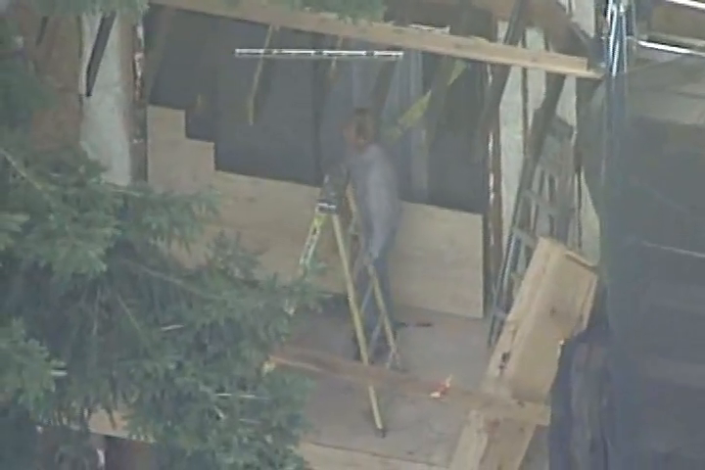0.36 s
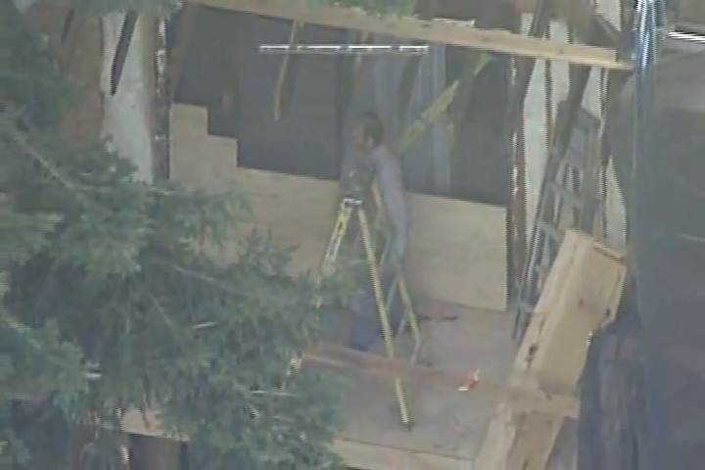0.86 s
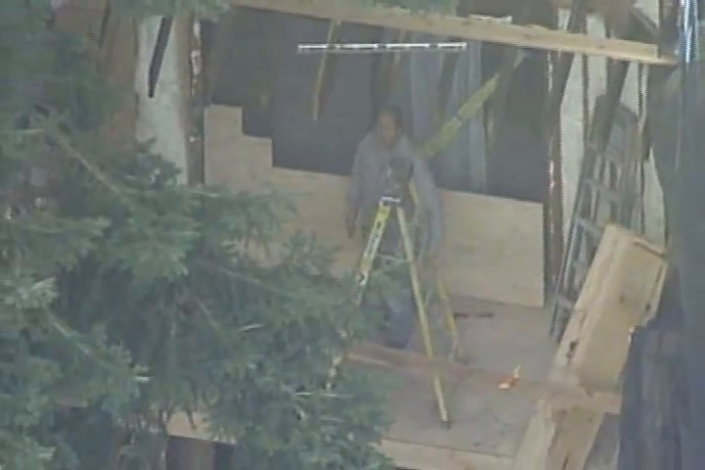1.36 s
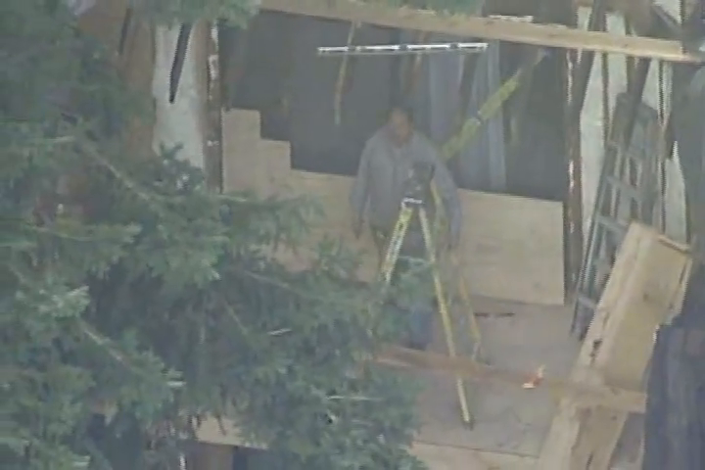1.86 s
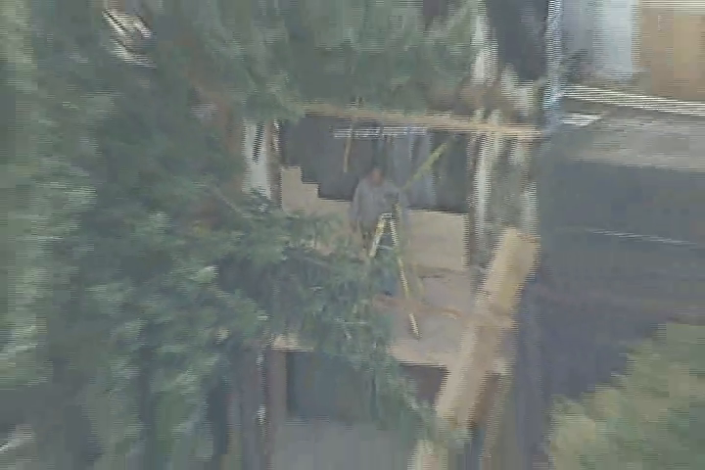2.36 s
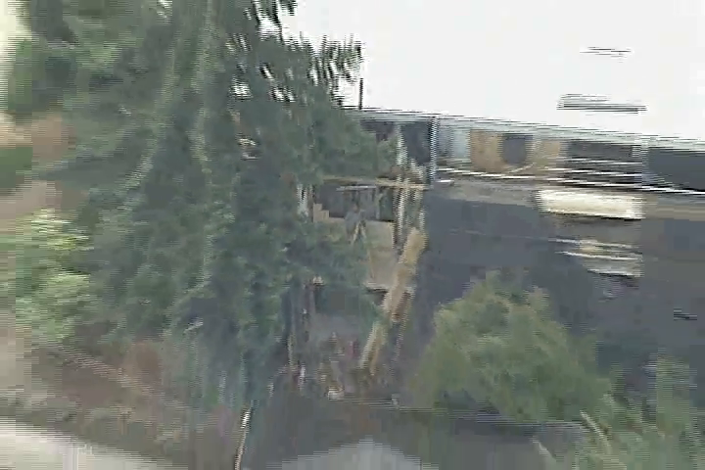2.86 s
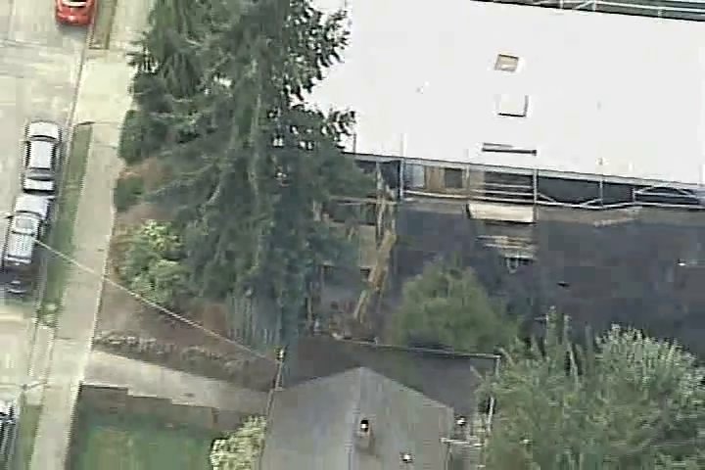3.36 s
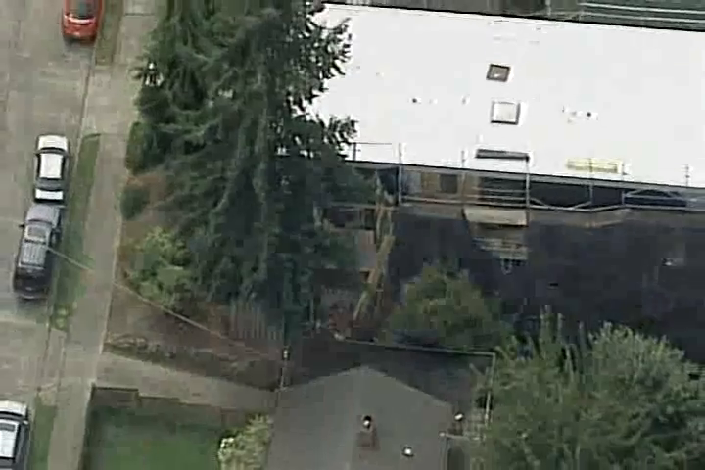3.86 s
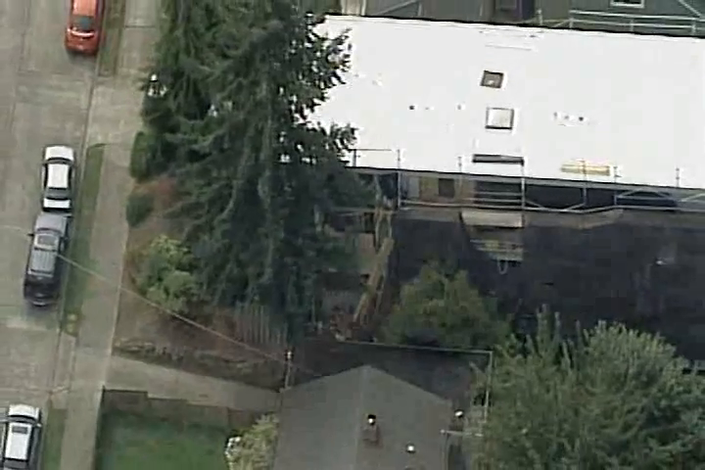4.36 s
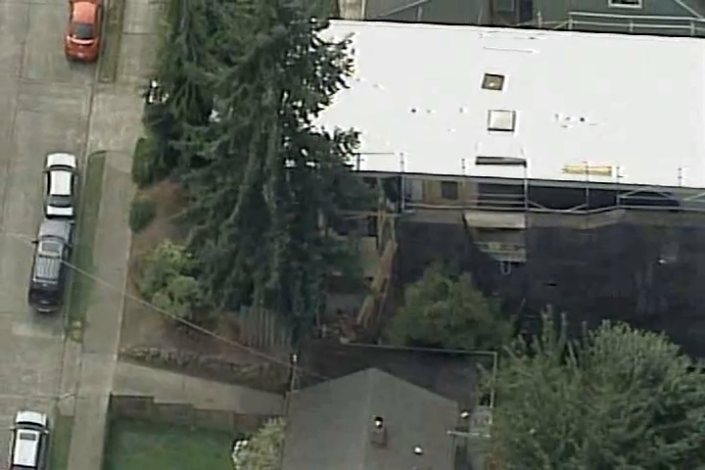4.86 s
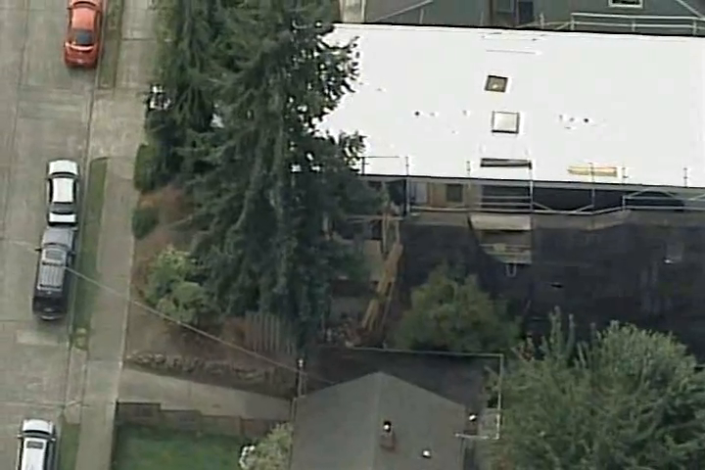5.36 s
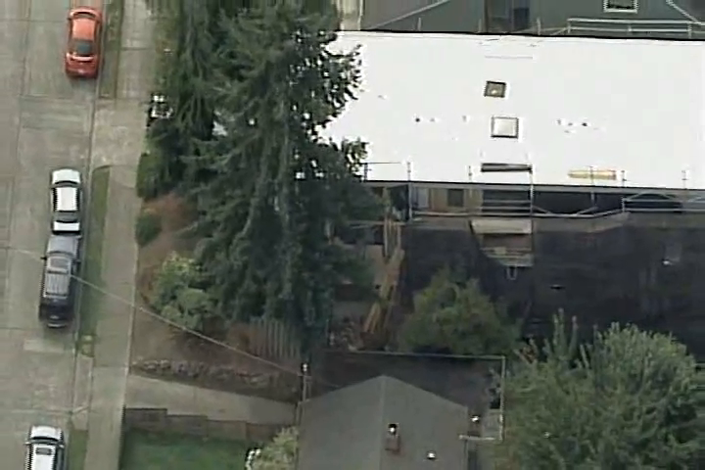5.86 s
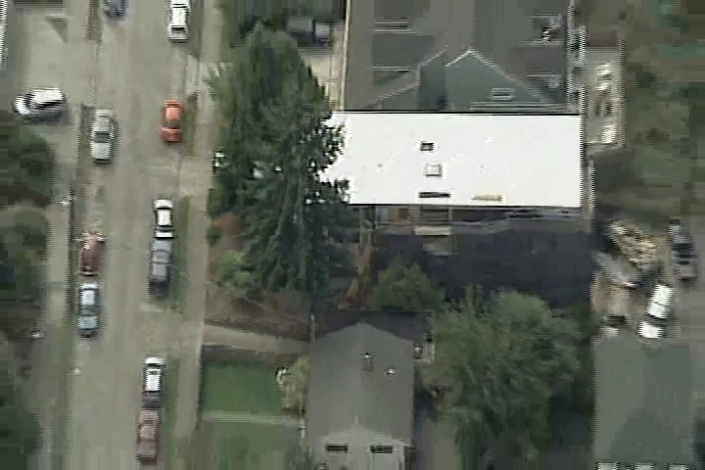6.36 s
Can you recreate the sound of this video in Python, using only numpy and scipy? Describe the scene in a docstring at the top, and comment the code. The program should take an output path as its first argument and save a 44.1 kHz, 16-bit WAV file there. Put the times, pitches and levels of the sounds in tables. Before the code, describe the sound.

A continuous helicopter drone from a microphone in the cabin, entirely on the left side. The deep hum pulses rapidly, over a low roar that throbs gently with the main blades, a breathy wash of air and several layers of high whine. Small, bright metallic rattles with tiny bounces break through irregularly all along, without the engine changing pace. The right side carries barely audible hiss and electrical buzz. Nothing is heard from the worker or street far below.

```python
"""Inside a helicopter cabin in steady flight, one microphone wired to the left input only.
The drive shaft and the tail rotor hum as two close tones that beat; gears, turbine and electrics whine as sines.
Shaped noise makes the rush of air, the low roar and a cabin boom. A loose part rings and snaps at listed
moments, and more faintly by chance when the beat swings deep. The right input holds hiss, buzz and a
trace of crosstalk."""
import sys
import numpy as np
from scipy import signal
from scipy.fft import rfft, irfft, next_fast_len
from scipy.io import wavfile
from scipy.ndimage import map_coordinates

SR = 44100
rng = np.random.default_rng(int(sys.argv[2]) if len(sys.argv) > 2 else 0)


def decibels_to_gain(level_db):
    """Convert a level in decibels to a linear amplitude gain (20 dB per decade)."""
    exponent = np.asarray(level_db, float) / 20
    return 10 ** exponent


def pcm_store(signal):
    """Save signal as 16-bit PCM."""
    levels = np.round(np.clip(np.atleast_2d(signal), -1, 1) * 32767)
    wavfile.write(sys.argv[1], SR, levels.astype(np.int16).T)


N = 296352  # length in samples

# slow level changes of three sounds: start_s, gear_mesh_db, tail_hum_db, cabin_boom_db
SLOW_LEVELS = [(0, -40, -23.5, -47), (.4, -41.5, -23.5, -46), (1, -41, -23.5, -49.5), (1.9, -42, -23, -45),
               (2.6, -40, -23, -48), (3.2, -40.5, -22.5, -50), (3.55, -40.5, -22.5, -45),
               (4.2, -40.3, -22.5, -47.5), (4.8, -41, -22.9, -44), (5.4, -42.5, -22.8, -46),
               (6.2, -38.5, -22.5, -50.5), (6.72, -38.5, -24, -46)]
# strong knocks of the loose part: start_s, high_ring_peak_db, low_ring_db (relative to the high ring)
STRONG_RATTLES = [(.0437, -27, .5), (.081, -26, 2), (0.128, -31, 2), (.2233, -27.5, 3.5), (.2346, -32, 0),
                  (0.2722, -29.5, 6.5), (0.4527, -24, 1.5), (.6781, -30, -1), (.775, -27, 3.5),
                  (0.9547, -29.5, 1), (1.002, -32, -13), (1.0384, -31.5, 5), (1.1355, -25.5, -2),
                  (1.1823, -26, -2), (1.2776, -30, -1), (1.3154, -23.5, -2.5), (1.496, -28, 1.5),
                  (1.5429, -24, 0.5), (1.6382, -29.5, 2), (1.6857, -27, 4), (1.7687, -31.5, -2),
                  (1.8178, -28.5, 1), (1.866, -30, 8), (1.9497, -29, -4), (1.9977, -27, 3),
                  (2.0083, -31, -3), (2.046, -26, 5.5), (2.405, -30, 1.5), (2.5487, -26, 0.5),
                  (2.5854, -24, -5), (2.5957, -28, 3.5), (2.632, -33, 0), (2.7285, -27.5, 3.5),
                  (2.7658, -32, 2.5), (2.8123, -26.5, 2), (2.9075, -25, 0), (2.9568, -23, 3),
                  (3.087, -28, 1.5), (3.1, -22, -3), (3.2314, -28, 2), (3.267, -33, -0.5),
                  (3.316, -33.5, 4), (3.459, -28, 0.5), (3.6021, -32.5, -1), (3.675, -31.5, -1),
                  (3.7827, -30.5, 2), (3.8195, -25, -1), (3.8669, -25, 1.5), (3.9623, -27.5, 0),
                  (3.998, -36, 5), (4.1423, -33, 2), (4.1786, -32, -3), (4.19, -30, -0.5), (4.2274, -24, 2),
                  (4.322, -28, 3.5), (4.3335, -29, -6), (4.3712, -24, 3.5), (4.4081, -27.5, 7.5),
                  (4.501, -31, 0), (4.5135, -31, -1), (4.5517, -22.5, 2), (4.6816, -30.5, -1.5),
                  (4.729, -32, 3), (4.777, -32.5, 5.5), (4.9098, -31, 2), (5.0536, -29.5, 7),
                  (5.09, -29.5, 4), (5.1006, -35, 1), (5.138, -33, 5), (5.2815, -24, 3.5),
                  (5.414, -25.5, 1.5), (5.4242, -32.5, -4), (5.46, -32.5, 3), (5.5941, -23, 1),
                  (5.6042, -31.5, 7), (5.6412, -29, 0), (5.7853, -25, 2.5), (5.8221, -31, -3),
                  (5.9167, -28.5, 0.5), (5.9651, -27.5, 1), (6.002, -30, -2), (6.1451, -28, -1.5),
                  (6.2879, -34, 3), (6.3624, -34.5, 2), (6.373, -29.5, -2), (6.5062, -19, -6.5),
                  (6.5528, -33, -1.5), (6.6494, -21.5, -3), (6.6973, -26.5, 2)]
BLADE_RATIO = .2615  # main blade passes per turn of the drive shaft


def unit(x):
    """Scaled to rms 1."""
    return x / np.sqrt(np.mean(x ** 2))


def wobble(rate):
    """A smooth random curve through rate random points a second."""
    points = rng.standard_normal(int(N * rate / SR) + 4)
    return map_coordinates(points, [np.arange(N) * rate / SR])


def curve(rows, column):
    """One column of a timed table, drawn as straight lines with a value per sample."""
    rows = np.array(rows)
    return np.interp(np.arange(N) / SR, rows[:, 0], rows[:, column])


def rotation(rows):
    """Turns made so far at the speed in a timed table."""
    return np.cumsum(curve(rows, column=1)) / SR


def tones(turns, table, waver_db):
    """Sines at multiples of a rotation, each wavering in level."""
    total = 0
    for multiple, level_db in table:
        level = decibels_to_gain(level_db + waver_db * wobble(6))
        wave = np.cos(2 * np.pi * (multiple * turns + rng.random()))
        total = total + level * np.sqrt(2) * wave  # sqrt(2) makes the level an rms level
    return total


def filtered(x, response):
    """x with each frequency multiplied by a complex response."""
    size = next_fast_len(x.shape[-1] + SR // 10)  # spare room for the tail
    spectrum = rfft(x, size) * response(np.fft.rfftfreq(size, 1 / SR))
    return irfft(spectrum, size)[..., :x.shape[-1]]


def noise(colour):
    """Noise of rms 1 coloured by points of frequency_hz, level_db."""
    points_hz, points_db = np.transpose(colour)

    def response(hz):
        return decibels_to_gain(np.interp(np.log(hz + 1), np.log(points_hz), points_db))

    return unit(filtered(rng.standard_normal(N), response))


def ring(x, modes):
    """x through causal resonances, each applied twice for steep flanks and a soft start."""
    def response(f):
        total = 0
        for centre, width, gain_db in modes:
            once = 1j * f * width / (centre ** 2 - f ** 2 + 1j * f * width)
            total = total + decibels_to_gain(gain_db) * once ** 2
        return total

    return filtered(x, response)


def drive_shaft():
    """Turns of the drive shaft, whose slightly drifting speed sets the pitch of every geared sound."""
    # start_s, speed_turns_per_s
    shaft_speed = [(0, 105.31), (.48, 105.371), (.96, 105.362), (1.44, 105.447), (1.92, 105.482),
                   (2.4, 105.425), (2.88, 105.389), (3.36, 105.37), (3.84, 105.364), (4.32, 105.383),
                   (4.8, 105.389), (5.28, 105.373), (5.76, 105.284), (6.24, 105.205), (6.72, 105.149)]
    return rotation(shaft_speed)


def hum(shaft):
    """The two strong tones that beat; air loads make the tail rotor less steady."""
    tail_ratio = 2 * 9.5 / 24  # tail blade passes per turn of the drive shaft
    shaft_start, tail_start = -.235, -.41  # angles at time zero, in turns
    drive_level = decibels_to_gain(-21.5 + .12 * wobble(4.04))
    tail_level = decibels_to_gain(curve(SLOW_LEVELS, column=2) + .21 * wobble(9))
    drive = drive_level * np.cos(2 * np.pi * (shaft + shaft_start))
    tail = tail_level * np.cos(2 * np.pi * (tail_ratio * shaft + tail_start))
    return np.sqrt(2) * (drive + tail)


def gear_mesh(shaft):
    """The loudest gear pair, one cycle of tone per tooth."""
    teeth_per_turn = 2 * 9.5
    return decibels_to_gain(curve(SLOW_LEVELS, column=1)) * tones(shaft, [(teeth_per_turn, 0)], waver_db=.6)


def gear_whine(shaft):
    """Many tones geared to the drive shaft, so they follow its speed."""
    # multiple_of_shaft_speed, level_db
    gear_tones = [(.2615, -51), (.3958, -53), (.7312, -55), (1.0464, -48), (1.2083, -48), (1.5837, -48),
                  (1.7917, -50), (2, -49), (2.0531, -51), (2.5233, -55), (3, -51), (3.1667, -50),
                  (3.9584, -53), (4, -58), (4.75, -60), (5, -61), (5.0951, -54), (7.5494, -65), (15, -67),
                  (15.3633, -54), (16, -58), (17.2085, -62), (18, -52), (18.3868, -62), (18.4767, -61),
                  (21, -54), (22, -63), (23.2086, -48), (36, -63), (38, -56.5), (69, -76), (70, -58),
                  (71, -76)]
    return tones(shaft, gear_tones, waver_db=.6)


def turbine_whine():
    """Tones geared to the turbine, which has its own drifting speed."""
    # start_s, whine_pitch_hz
    turbine_speed = [(0, 4946.5), (1.12, 4947), (1.4, 4961.3), (1.65, 4961), (2, 4957), (2.9, 4959.3),
                     (6.72, 4959.6)]
    # multiple_of_whine_pitch, level_db
    turbine_tones = [(.1481, -61), (.1575, -62), (.1818, -59), (.2093, -67), (.3363, -66), (.4725, -65),
                     (.5455, -61), (.5714, -66), (.7143, -66), (.7273, -65), (.8846, -70), (.9231, -64),
                     (.9787, -68), (.987, -65), (1, -47), (1.013, -63), (1.4545, -76), (1.5751, -75),
                     (1.6667, -73), (2, -72)]
    return tones(rotation(turbine_speed), turbine_tones, waver_db=.5)


def electric_whine():
    """Electrical tones that hold a steady pitch."""
    # pitch_hz, level_db
    electric_tones = [(2499.9, -54), (4999.8, -68)]
    return tones(np.arange(N) / SR, electric_tones, waver_db=.4)


def air(shaft, shake):
    """Roar throbs with the main blades; the rush also flutters with the airframe's shaking."""
    # low roar shaped by the cabin: frequency_hz, relative_level_db (per Hz)
    roar_colour = [(10, -37), (30, -22), (60, -14), (80, -6), (130, -4.5), (190, -1), (250, -4.5),
                   (275, -8), (300, -8), (350, -10.5), (400, -9), (480, -17), (560, -12), (680, -15.5),
                   (1100, -28.5), (2000, -45.5)]
    # rush of air and engine: frequency_hz, relative_level_db (per Hz)
    rush_colour = [(500, -22), (1000, -3.5), (1500, -3.5), (1800, 0), (2600, -3), (3400, -3.5),
                   (4500, -6.5), (5300, -9), (6000, -14.5), (8000, -15), (9000, -23), (13500, -34),
                   (14060, -20.5), (14400, -28), (15700, -38)]
    blades = np.cos(2 * np.pi * BLADE_RATIO * shaft)
    roar_db = -34.5 + .56 * blades + .65 * wobble(12)
    roar = decibels_to_gain(roar_db) * noise(roar_colour)
    rush_db = -40 + .86 * blades - .63 * shake + .51 * wobble(40)
    rush = decibels_to_gain(rush_db) * noise(rush_colour)
    return roar + rush


def rattle(shake):
    """Each rattle is a blow and three quick bounces; faint ticks come in any deep downswing."""
    # the part's high ring: centre_hz, width_hz (of one pass), gain_db
    high_modes = [(5257, 250, 7), (5540, 110, -25)]
    # the part's low ring: centre_hz, width_hz (of one pass), gain_db
    low_modes = [(3200, 270, 0), (3282, 503, 15)]
    # broad snap of the contact: centre_hz, width_hz (of one pass), gain_db
    snap_modes = [(990, 590, -2.5), (1840, 410, 7), (2610, 520, -5), (3680, 550, 1.5), (7000, 520, -13.5),
                  (8200, 780, -19), (10420, 640, -9), (11500, 870, -14.5), (14700, 2800, -27)]
    length = SR // 30
    blow = np.zeros(length)
    blow[0] = 1
    voices = [ring(blow, modes) for modes in (high_modes, low_modes, snap_modes)]
    part = np.zeros(N + length)
    for start_s, peak_db, low_db in [*STRONG_RATTLES, *weak_rattles(shake)]:
        # a blow rich in low ring snaps harder
        snap_db = -4 + .58 * low_db + 3.5 * rng.standard_normal()
        blows = blow.copy()
        bounce_s = rng.uniform(.0006, .004, size=3)
        blows[np.int_(SR * bounce_s)] = rng.uniform(.25, .7, size=3)
        knock = np.zeros(length)
        for voice, level_db in zip(voices, (0, low_db, snap_db)):
            sound = signal.fftconvolve(blows, voice)[:length]
            knock += decibels_to_gain(level_db) * sound / abs(sound).max()
        start = round(start_s * SR)
        part[start:start + length] += decibels_to_gain(peak_db) * knock
    # the deeper the swing below -0.8 rms, the more ticks a second
    ticks_per_s = 150 * np.clip(-shake - .8, 0, None)
    ticks = rng.random(N) < ticks_per_s / SR
    faint = decibels_to_gain(-21 + 3 * rng.standard_normal(N)) * ticks
    faint_low = decibels_to_gain(-10) * ring(faint, low_modes)
    faint_snap = decibels_to_gain(-10) * ring(faint, snap_modes)
    return part[:N] + ring(faint, high_modes) + faint_low + faint_snap


def weak_rattles(shake):
    """Rows like the strong rattles: any deep downswing may throw the part lightly."""
    depth = 1.1  # downswing needed, in rms
    lead_s, rest_s = .0012, .005  # lead on the lowest point; pause around a strong rattle
    chance_per_swing = .25
    start_s = signal.find_peaks(-shake, height=depth)[0] / SR - lead_s
    luck = rng.random(len(start_s))
    spread = rng.standard_normal((len(start_s), 2))
    gaps_s = abs(start_s[:, None] - np.array(STRONG_RATTLES)[:, 0])
    free = gaps_s.min(axis=1) > rest_s
    peak_db = -39.5 + 2.5 * spread[:, 0]
    low_db = 2 + 4 * spread[:, 1]
    rows = np.c_[start_s, peak_db, low_db]
    return rows[free & (luck < chance_per_swing) & (start_s > 0)]


def boom():
    """Narrow noise in a cabin air mode, swelling and sinking."""
    # the air mode: centre_hz, width_hz (of one pass), gain_db
    cabin_mode = [(611.2, 37, 0)]
    level_db = curve(SLOW_LEVELS, column=3) + wobble(4.98)
    return decibels_to_gain(level_db) * unit(ring(rng.standard_normal(N), cabin_mode))


def input_buzz():
    """Electrical buzz: steady multiples of one low pitch, the same on both inputs."""
    # multiple_of_buzz_pitch, level_db
    buzz_tones = [(1, -79), (2, -99), (3, -83), (5, -92), (7, -98), (8, -106), (9, -89), (11, -99),
                  (13, -106), (15, -102), (18, -93), (19, -105), (21, -103), (23, -106), (25, -107),
                  (27, -99)]
    buzz_hz = 59.94
    return tones(buzz_hz * np.arange(N) / SR, buzz_tones, waver_db=1.0)


def input_hiss():
    """Coloured noise, drawn separately for each input."""
    # frequency_hz, relative_level_db (per Hz)
    hiss_colour = [(30, 6), (300, -4), (2300, -1), (5000, 3), (15000, 6), (15500, 15), (15734, 19)]
    return decibels_to_gain(-74) * np.array([noise(hiss_colour), noise(hiss_colour)])


def scene():
    """Everything reaches the left input; the right gets a trace of crosstalk."""
    shaft = drive_shaft()
    beat = hum(shaft)
    shake = unit(beat)
    whine = gear_mesh(shaft) + gear_whine(shaft) + turbine_whine() + electric_whine()
    cabin = beat + whine + air(shaft, shake) + rattle(shake) + boom()
    return cabin * decibels_to_gain([[0], [-73]])  # left, right in dB


def top_cut(x):
    """Nothing passes above the cut-off."""
    return signal.sosfilt(signal.butter(12, 16110, fs=SR, output="sos"), x)


def record(dry):
    """Both inputs add hiss and buzz, then a steady band limit weakens the highest treble."""
    top_hz = 15760
    mix = filtered(dry + input_buzz() + input_hiss(), lambda hz: np.where(hz < top_hz, 1, decibels_to_gain(-30)))
    return top_cut(mix)


dry = scene()
out = record(dry)
pcm_store(out)
```